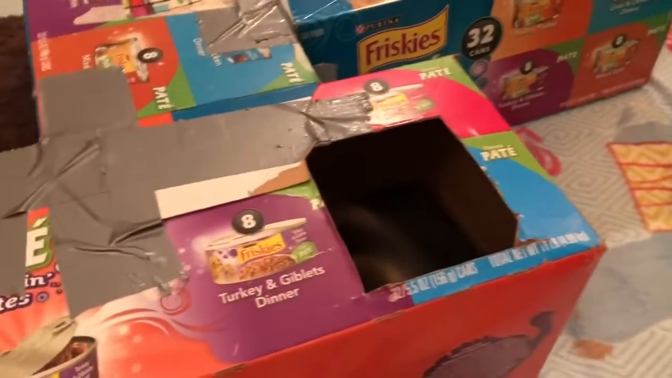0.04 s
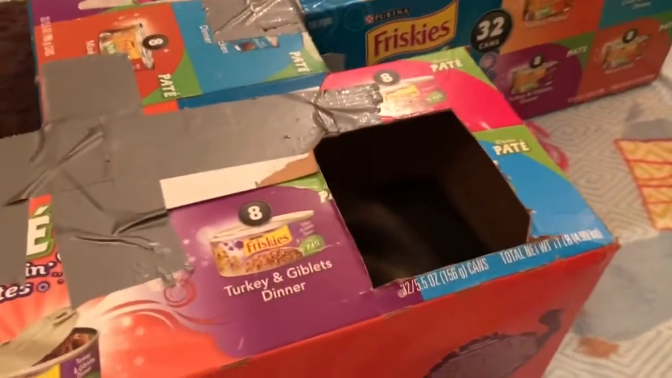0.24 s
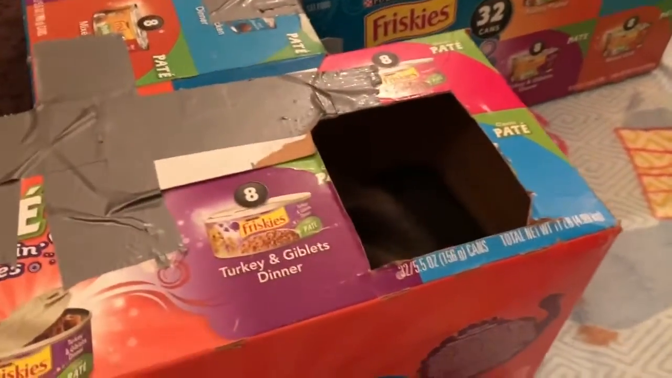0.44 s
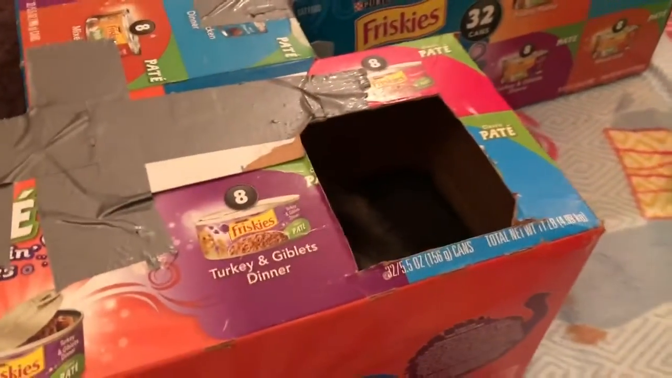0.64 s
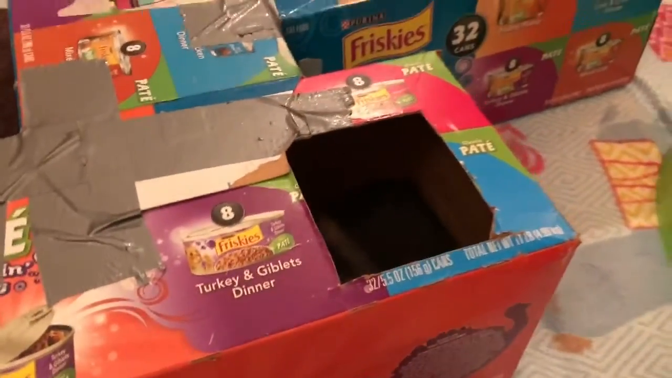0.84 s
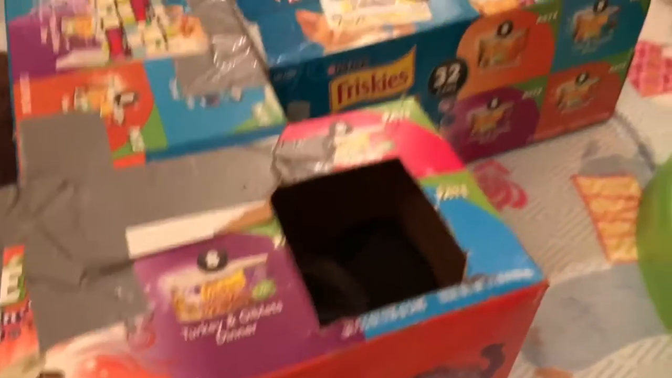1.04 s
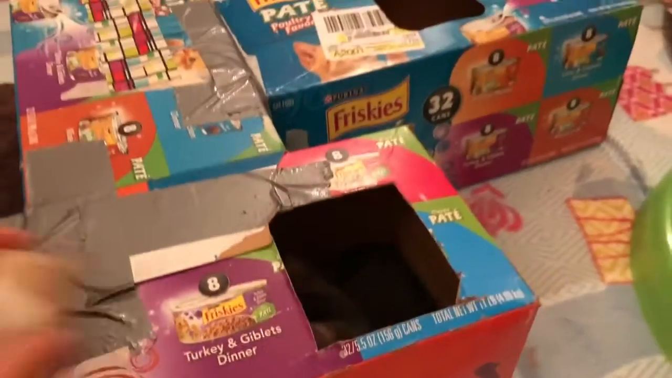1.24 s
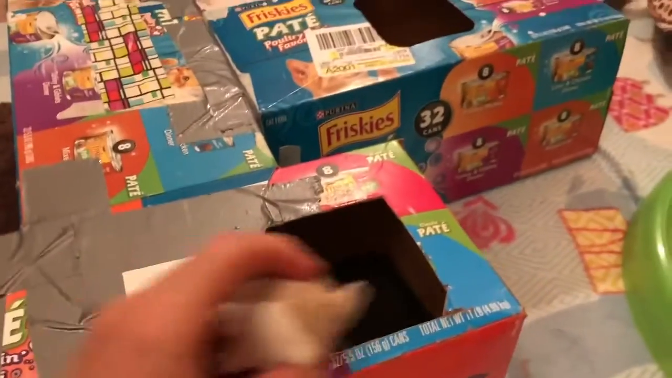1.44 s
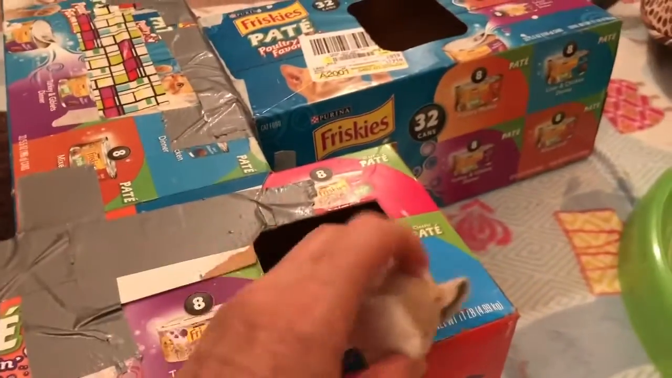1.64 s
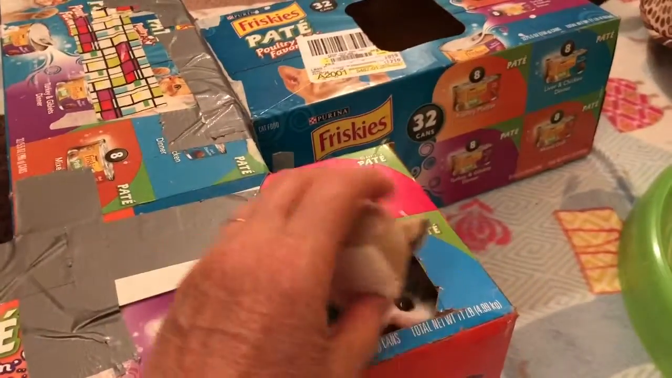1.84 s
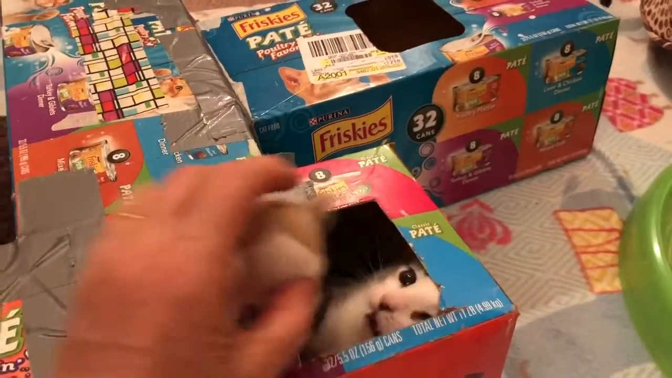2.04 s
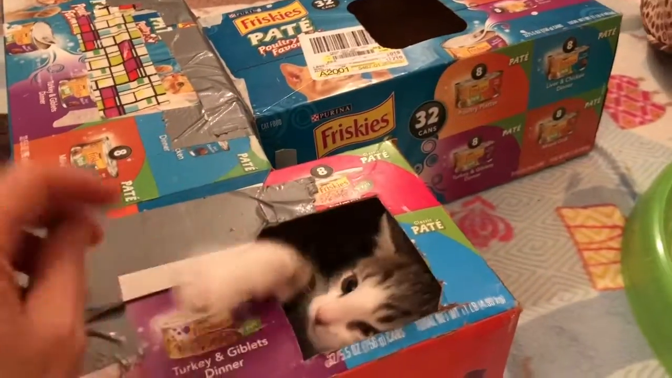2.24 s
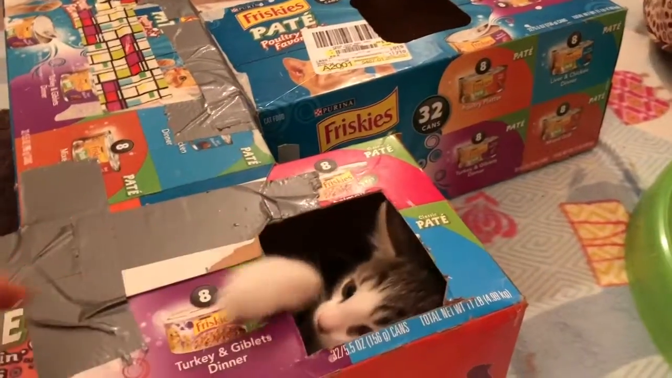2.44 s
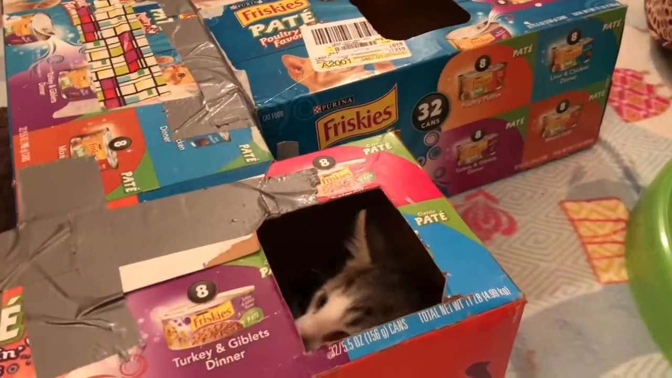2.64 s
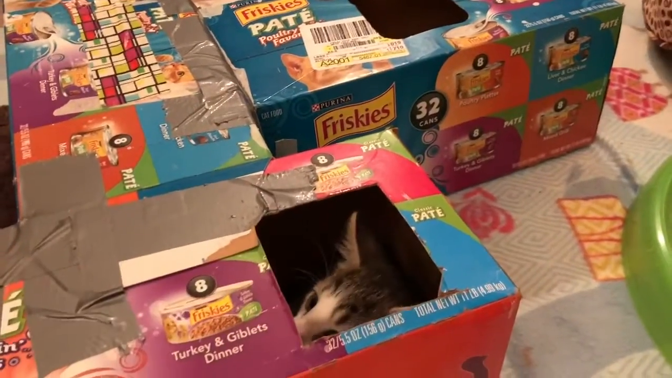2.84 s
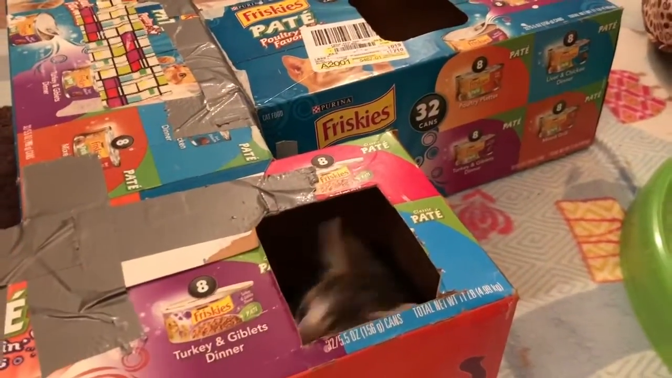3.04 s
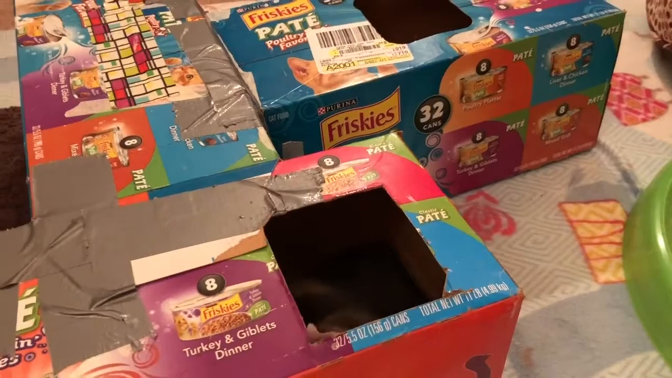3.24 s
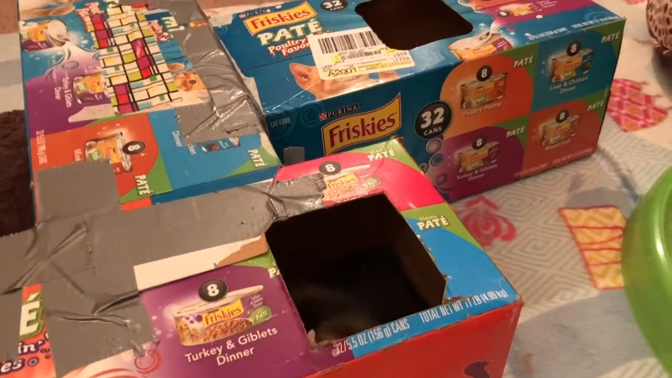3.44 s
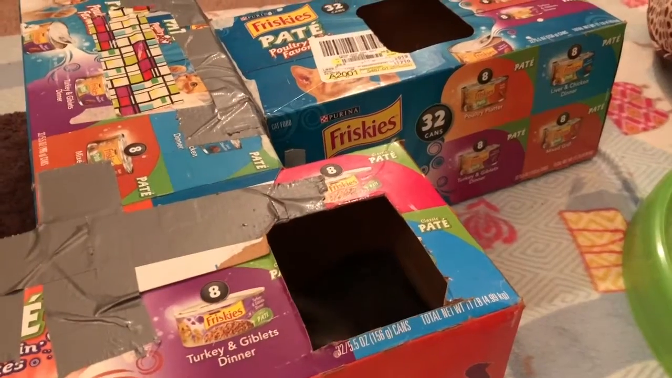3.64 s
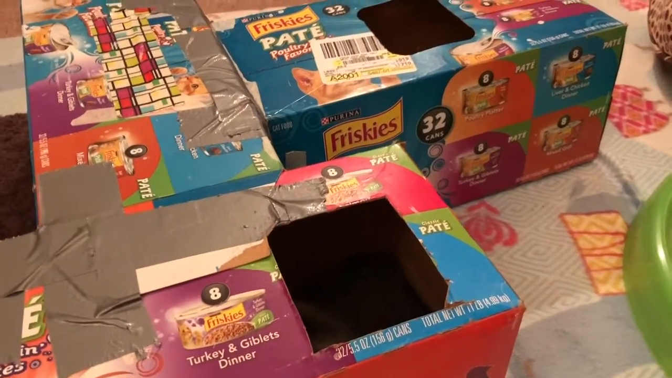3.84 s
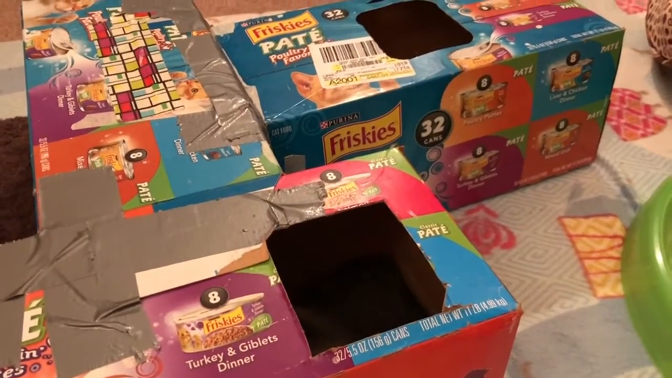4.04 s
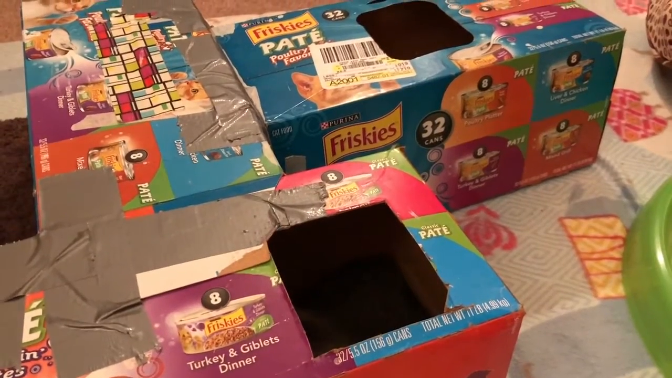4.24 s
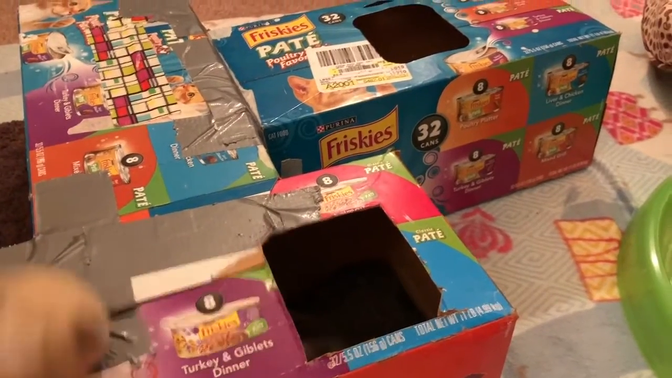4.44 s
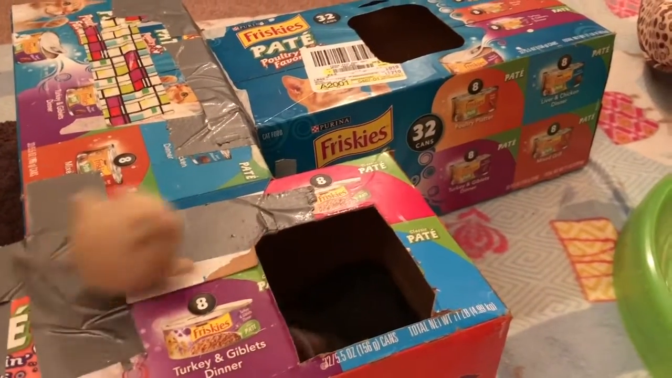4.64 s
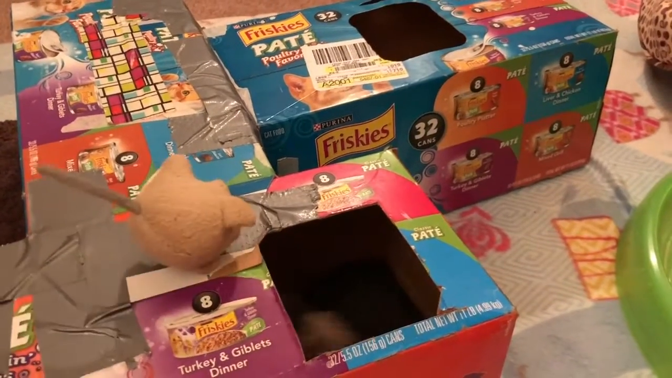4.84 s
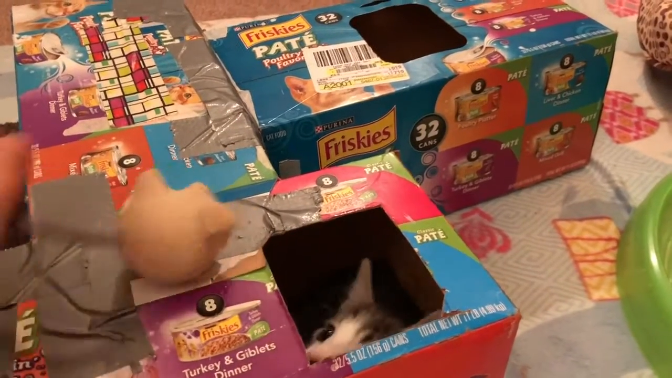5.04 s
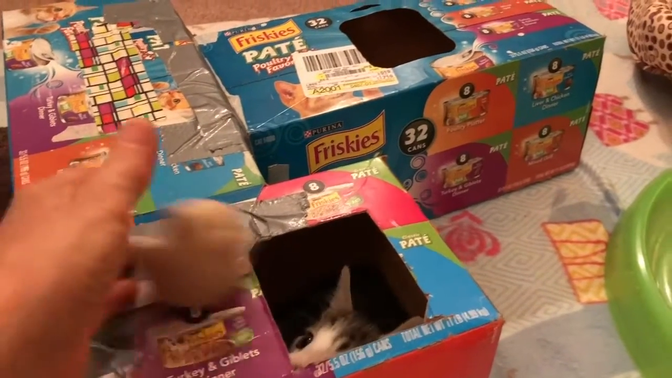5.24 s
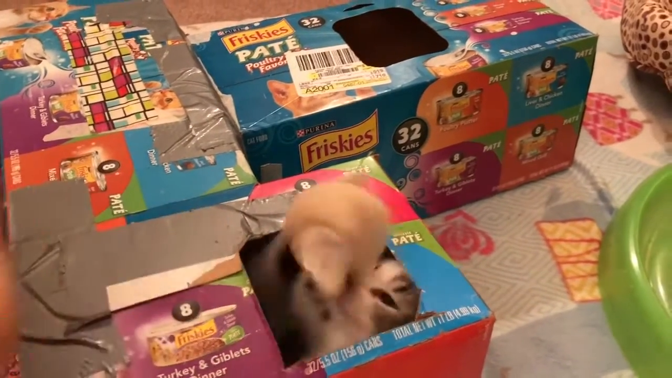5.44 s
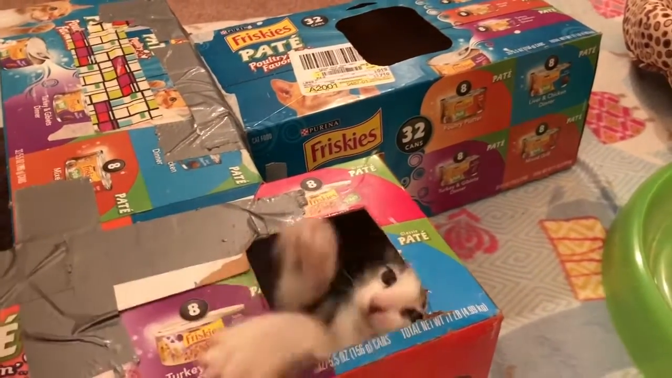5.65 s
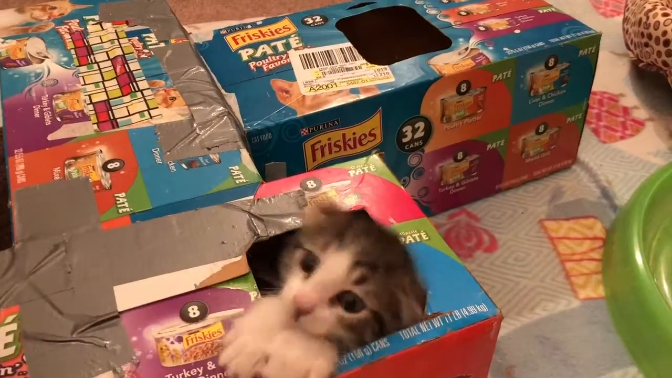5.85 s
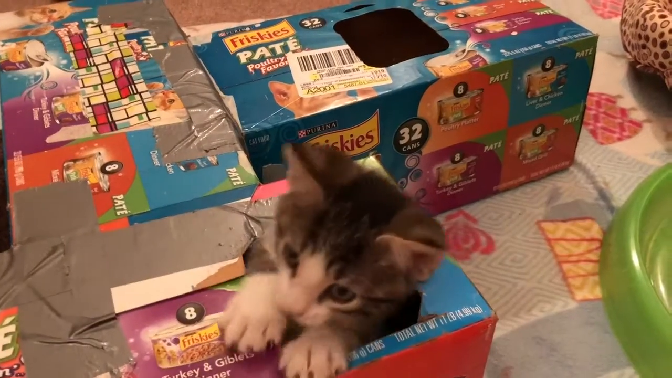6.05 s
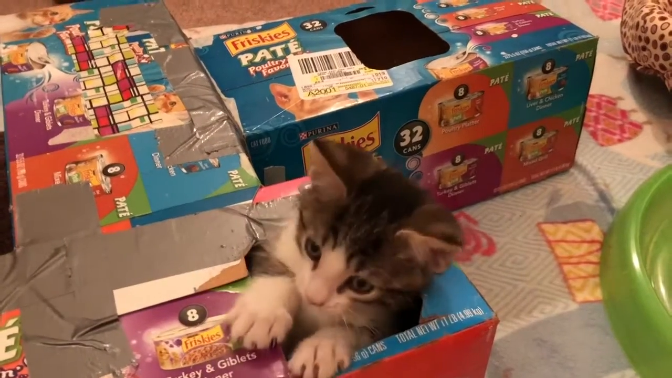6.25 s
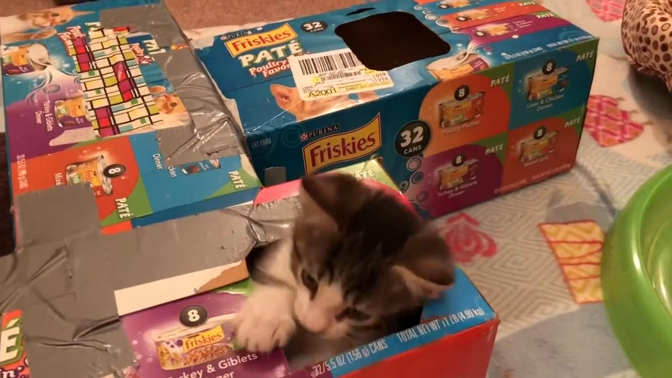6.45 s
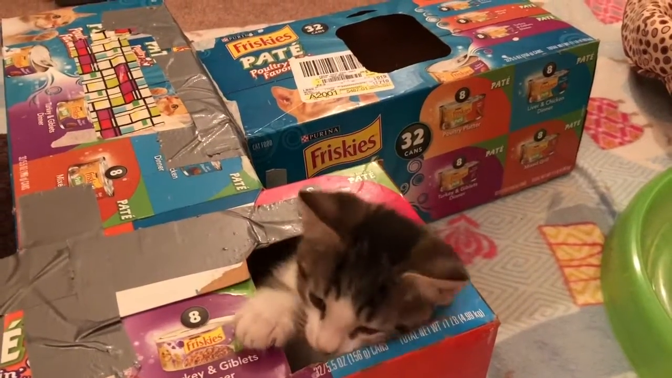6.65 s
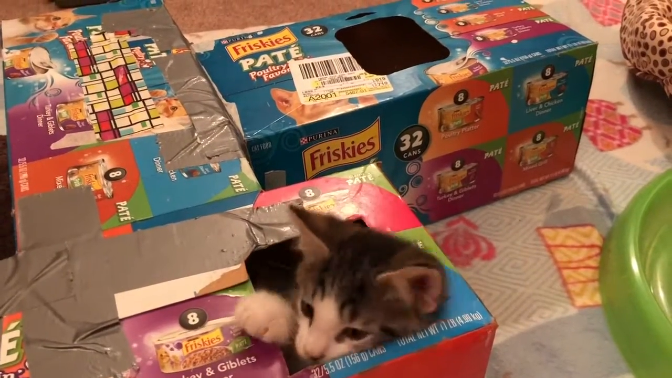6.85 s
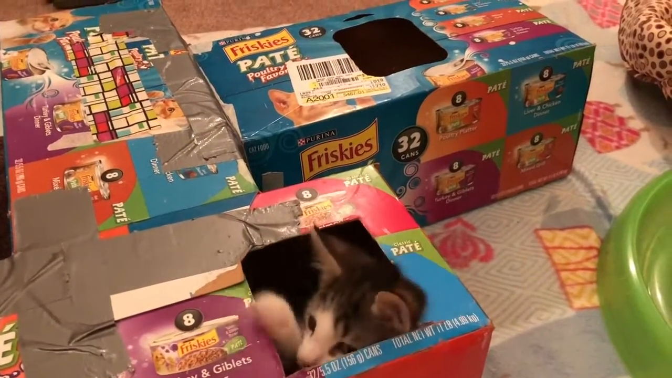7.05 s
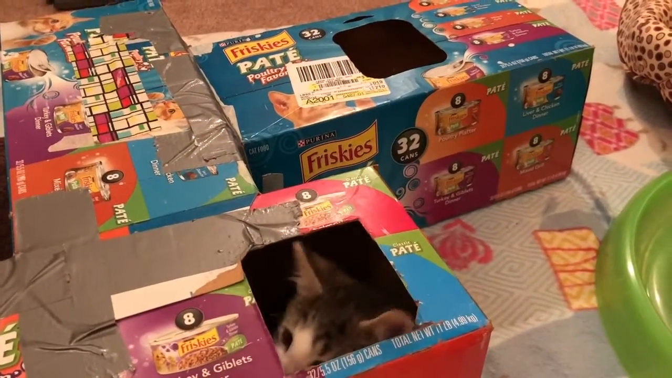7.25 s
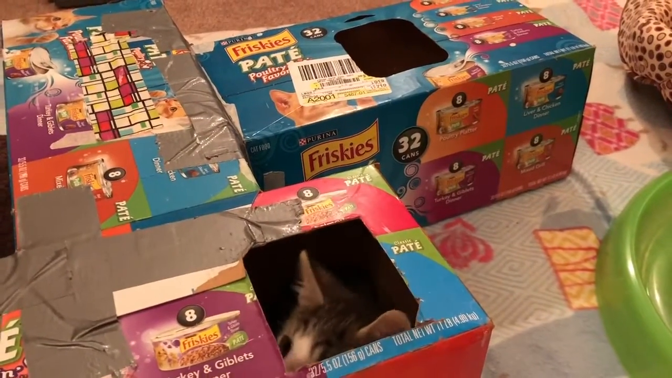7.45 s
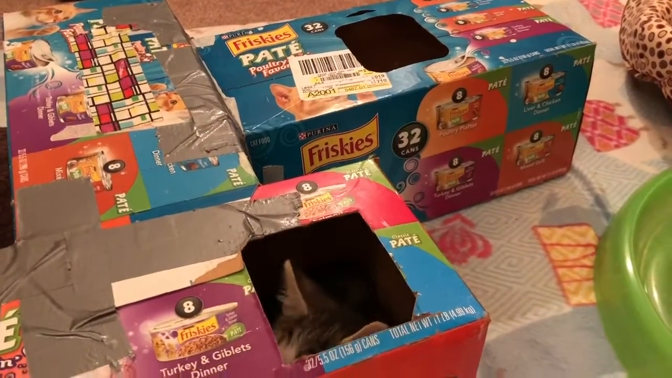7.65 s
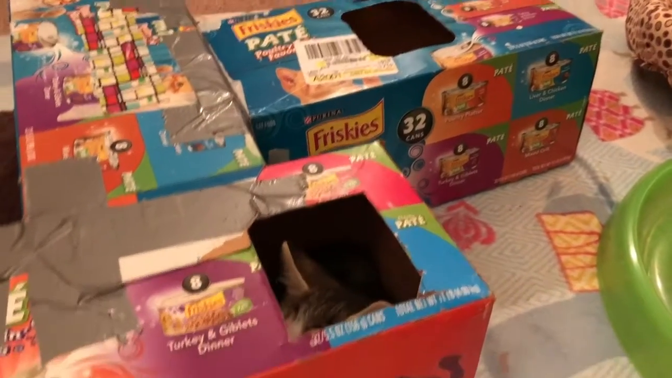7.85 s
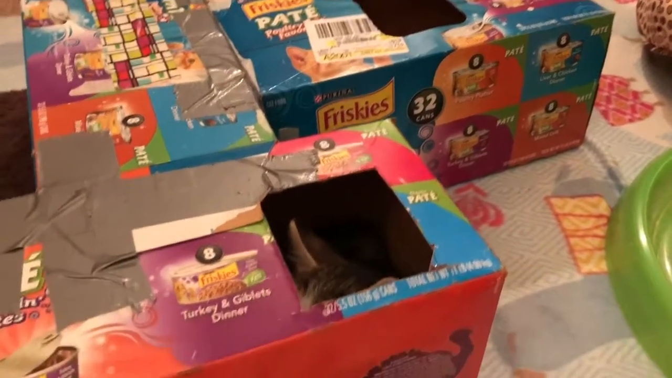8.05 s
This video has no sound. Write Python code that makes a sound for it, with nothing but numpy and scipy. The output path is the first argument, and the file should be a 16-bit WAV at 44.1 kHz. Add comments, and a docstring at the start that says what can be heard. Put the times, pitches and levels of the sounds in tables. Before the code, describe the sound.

A bead rattle in a soft toy clatters brightly while a kitten's paws knock, scuff and rustle inside hollow cardboard boxes in a quiet room.

```python
"""A bead rattle inside a soft toy clatters as the toy is waved, dropped and batted about: noise pushes drive
the modes of its shell, bead by bead. A kitten moves in a maze of taped cardboard boxes in a quiet room:
knocks of paws and toy are dispersed bending pulses and damped panel modes, coloured by box resonances.
Fur, claws and plush rub on the cardboard as stick-slip grains through shifting panel resonances.
A short echo and a low room tone with a faint hum surround them."""
import sys
import numpy as np
from scipy import signal
from scipy.fft import rfft, irfft, next_fast_len
from scipy.io import wavfile
from scipy.ndimage import uniform_filter1d

SR = 44100
rng = np.random.default_rng(int(sys.argv[2]) if len(sys.argv) > 2 else 0)


def output_pcm(signal):
    """Save a mono or channel-first signal as 16-bit PCM at the path in sys.argv[1].

    Samples are clipped to [-1, 1] before scaling.
    """
    pcm = np.clip(np.atleast_2d(signal).T, -1, 1) * 32767
    wavfile.write(sys.argv[1], SR, np.round(pcm).astype(np.int16))


N = 357638
TIME = np.arange(N) / SR

# the rattle shell's modes in a main, an upper and a lower group: (f/Hz, width/Hz, relative level/dB)
SHELL_MAIN_MODES = [(7760, 340, -12), (8364, 570, 5.5), (8550, 230, 5.5), (9510, 300, -7.5),
                    (9600, 300, -3)]
SHELL_UPPER_MODES = [(12700, 1000, -11), (14350, 550, 0), (14850, 600, -8), (15500, 400, -1)]
SHELL_LOWER_MODES = [(2574, 1600, -15.5), (4070, 1400, -5), (5000, 200, -7), (5730, 570, -11),
                     (6770, 1700, 0.5)]


def undb(db):
    """The decibel is logarithmic: level in dB to amplitude gain."""
    return 10 ** (np.asarray(db) / 20)


def unit(x, seconds=None):
    """Level is mean power: scale to rms 1, over the first seconds if given."""
    head = x if seconds is None else x[:int(seconds * SR)]
    return x / np.sqrt(np.mean(head ** 2) + 1e-30)


def add(track, at, sound):
    """Superposition: mix a sound into the track at a time in seconds."""
    i = int(np.clip(at * SR, 0, N - 1))
    track[i:i + len(sound)] += sound[:N - i]


def band(x, lo_hz, hi_hz, order=2):
    """Causal band-pass filtering."""
    edges_hz = [lo_hz, min(hi_hz, .47 * SR)]
    return signal.sosfilt(signal.butter(order, edges_hz, "band", fs=SR, output="sos"), x)


def colour(x, points):
    """Spectral shaping: gain interpolated between (f/Hz, gain/dB) points on a logarithmic frequency axis."""
    hz, db = np.transpose(points)
    size = next_fast_len(len(x))
    f = np.fft.rfftfreq(size, 1 / SR) + 1
    gain = undb(np.interp(np.log(f), np.log(hz), db))
    return irfft(rfft(x, size) * gain, size)[:len(x)]


def resonate(x, hz, width_hz):
    """Driven damped oscillator: one resonance, gain 1 at its centre."""
    hz = min(hz, .45 * SR)
    return signal.lfilter(*signal.iirpeak(hz, hz / width_hz, fs=SR), x)


def grains(per_second, spread_db):
    """Poisson-like process: randomly timed tiny impacts of uneven size and either sign."""
    size = undb(spread_db * np.clip(rng.standard_normal(N), -2, 2)) * rng.choice([-1, 1], N)
    return (rng.random(N) < per_second / SR) * size


def walk(rate):
    """Slow random modulation: a new level every 1 / rate s, joined by ramps; spread near 1."""
    k = max(int(SR / rate), 1)
    held = np.repeat(rng.standard_normal(N // k + 1), k)
    return 1.0 * uniform_filter1d(held, k)[:N]


def room_tone(level_db=-59, hum_hz=120, hum_db=-68):
    """Stationary coloured noise: low household rumble with a faint mains hum, both wavering slightly."""
    # spectrum of the rumble: (f/Hz, relative level/dB)
    rumble_spectrum = [(20, -43), (30, -38.5), (42, -4.5), (70, -4.5), (120, -0.5), (170, -2), (240, -5),
                       (320, -6), (420, -15.5), (700, -19.5), (1500, -27), (3000, -31.5), (7000, -32.5),
                       (15500, -38.5)]
    rumble = unit(colour(rng.standard_normal(N), rumble_spectrum))
    rumble = rumble * undb(level_db - 0.25 * walk(2.4))
    hum = np.sqrt(2) * np.sin(2 * np.pi * hum_hz * TIME)
    return rumble + undb(hum_db - 0.5 * walk(5.3)) * hum


def room(x, t60=0.39, wet_db=-20.5, gap_s=0.0022):
    """Reverberation: an exponentially decaying echo of a furnished room, which swallows the treble."""
    t = np.arange(SR // 2) / SR
    tail = colour(rng.standard_normal(len(t)), [(1500, 0.0022), (9500, -2), (14000, -11)])
    fade = np.exp(-np.log(1000) * t / t60) * (t > gap_s)
    echo = tail * fade / np.sqrt(np.sum(fade ** 2))
    return x + undb(wet_db) * signal.fftconvolve(x, echo)[:N]


def box(x, stretch=1):
    """Cavity and wall resonance: box modes stand out of what shakes them; stretch retunes the compartment."""
    # air and wall resonances: (f/Hz, width/Hz, level over the dense modes between them/dB)
    box_modes = [(45, 16, 6.5), (90.5, 14, 5.5), (121.2, 12, 9), (160.5, 31, 13.5), (286.5, 5.4, 8),
                 (313, 27, 2.5), (484, 76, 5.5), (668, 30.8, 3.5), (746, 32, 4.5), (1170, 150, 2),
                 (2415, 750, 8.5)]
    return x + sum((undb(db) - 1) * resonate(x, hz * stretch, width) for hz, width, db in box_modes)


def slips(catch_db=2.5, snag_db=-11):
    """Stick-slip friction: fibres catch and let go in uneven spurts of dense grains, with odd claw snags."""
    fibres = unit(grains(per_second=2200, spread_db=2)) + .55 * rng.standard_normal(N)
    snags = unit(grains(per_second=45, spread_db=3))
    return (fibres + undb(snag_db) * snags) * undb(catch_db * walk(70))


def shifting(x, count=26, shift_db=5, sharpness=9):
    """Moving excitation point: as the contact slides, one panel resonance after another takes over."""
    centres = np.geomspace(350, 9000, count) * np.exp(.04 * rng.standard_normal(count))
    panels = sum(resonate(x, hz, hz / sharpness) * undb(shift_db * walk(24)) for hz in centres)
    return .55 * x + panels


def stroke(at, length):
    """Speed governs friction level: a stroke swells to its fastest moment and eases off more slowly."""
    edge_db, rise_share, roundness = 7, 0.47, 1.47  # length is the time within edge_db of the peak
    away = np.maximum((at - TIME) / rise_share, (TIME - at) / (1 - rise_share)) / length
    near, gain = away < 10, np.zeros(N)
    gain[near] = undb(-edge_db * away[near] ** roundness)
    return gain


def rubbing(friction, rasp_db=-3.5, hiss_db=5.0):
    """Two radiation paths: fur and plush hiss at the surface and rasp through the walls, stroke by stroke."""
    # filters of the walls and of the surface: (f/Hz, relative gain/dB)
    wall_filter, surface_filter = [(100, -11), (220, 6), (450, -5), (1000, -5), (1400, -8.5), (2200, -20),
                                   (5000, -28.5)], [(600, -27), (1200, -2), (1800, -4.5), (3000, 2.5),
                                                 (5000, 1), (7000, -1.5), (10000, -6), (15500, 2.5)]
    # slides: (fastest moment t/s, length/s, wall level/dB before rasp_db, surface level/dB before hiss_db)
    slides = [(0.34, 0.24, -66, -82), (0.588, 0.11, -49.5, -64.5), (1.183, 0.029, -41.5, -59),
              (1.36, 0.34, -61.5, -72), (1.576, 0.04, -51.5, -58), (1.71, 0.18, -53.5, -65.5),
              (1.966, 0.19, -60.5, -64.5), (2.106, 0.024, -57, -61), (2.239, 0.13, -47.5, -58.5),
              (2.59, 0.34, -56, -67), (2.863, 0.04, -58, -88), (3.09, 0.09, -61, -86),
              (4.513, .06, -67, -70), (4.68, 0.13, -58.5, -63), (4.909, 0.12, -56.5, -74.5),
              (5.267, 0.032, -52, -62), (5.453, 0.13, -51.5, -64.5), (5.652, 0.13, -50.5, -59),
              (5.803, 0.056, -49.5, -58), (5.982, 0.21, -45, -58.5), (6.264, 0.12, -53, -61.5),
              (6.457, 0.1, -58, -61), (6.64, 0.094, -56, -61.5), (7.019, 0.4, -52.5, -62),
              (7.299, 0.021, -67, -67), (7.372, 0.051, -49, -59), (7.404, 0.047, -55, -73),
              (7.612, 0.12, -59, -74)]
    rasp = unit(colour(box(friction), wall_filter)) * undb(rasp_db)
    hiss = unit(colour(friction, surface_filter)) * undb(hiss_db)
    return sum(stroke(at, length) * (undb(wall_db) * rasp + undb(surface_db) * hiss)
               for at, length, wall_db, surface_db in slides)


def scuffs(friction):
    """Friction-driven resonance: a paw drags over one panel, which sings, swelling and easing off."""
    # drags: (middle t/s, length between the 1/e points/s, panel f/Hz, width before broadening/Hz, level/dB)
    drags = [(0.54, 0.026, 2600, 2000, -66), (0.618, 0.0051, 2700, 800, -42), (1.184, 0.029, 576, 300, -45),
             (1.171, 0.012, 1900, 1600, -51), (1.435, 0.0084, 2980, 2500, -57.5),
             (1.558, 0.016, 3220, 2200, -56), (1.643, 0.015, 3950, 3500, -62),
             (1.733, 0.014, 4000, 2500, -56), (1.781, 0.0053, 3000, 2500, -57),
             (1.85, 0.01, 5100, 4000, -65), (1.999, 0.0068, 3460, 1600, -47), (2.865, 0.019, 900, 600, -60),
             (3.086, 0.032, 930, 303, -60), (3.127, 0.012, 1493, 500, -59.5),
             (5.479, 0.025, 524, 296.8, -43.5), (5.592, 0.024, 506, 248, -43), (5.68, .02, 2700, 1800, -58),
             (5.797, 0.0061, 1150, 500, -58), (5.968, .008, 2500, 1800, -54),
             (6.04, 0.025, 2280, 1900, -54), (6.224, 0.0032, 3300, 3500, -46),
             (6.24, 0.04, 2130, 2000, -50.5), (6.434, 0.093, 2320, 900, -62),
             (6.607, 0.047, 2300, 1200, -59.5), (6.69, .03, 3220, 1000, -64),
             (6.788, 0.053, 2600, 900, -64), (6.964, 0.17, 900, 380, -58),
             (7.054, 0.0071, 1000, 600, -43.5), (7.07, 0.12, 13000, 7000, -67),
             (7.11, 0.021, 2600, 3000, -58), (7.393, .01, 3520, 7000, -48)]
    out = np.zeros(N)
    for at, length, hz, width, db in drags:
        broad = 1.2 * width  # each of two resonances in series
        song = unit(resonate(resonate(friction, hz, broad), hz, broad))
        out += song * undb(db) * np.exp(-(2 * (TIME - at) / length) ** 2)
    return out


def bending_pulse(size, lag_s, lag_hz=300):
    """Dispersion of bending waves: highs arrive first, the delay goes as 1 / sqrt(f), lag_s at lag_hz."""
    f = np.fft.rfftfreq(size, 1 / SR)
    return irfft(np.exp(-4j * np.pi * lag_s * np.sqrt(lag_hz * f)), size)


def panel_modes(t, count=70):
    """Modal superposition: every spot rings with its own bending modes, thinning out towards the treble."""
    hz = 45 * (6000 / 45) ** ((np.arange(count) + rng.random(count)) / count)
    waves = np.sin(2 * np.pi * (hz[:, None] * t + rng.random((count, 1))))
    return unit(np.sqrt(hz) @ waves)


def softened(hz, contact_ms):
    """Contact-time law: a soft push cannot shake what swings faster than it lasts; the level change in dB."""
    return -10 * np.log10(1 + (hz * contact_ms / 1000) ** 6)


def dulled(x, contact_ms, corner_swings=2.1):
    """Contact-time low-pass: the longer the push, the lower the pitch above which a blow falls away."""
    hz = np.clip(corner_swings * 1000 / contact_ms, 500, 12000)
    return signal.sosfilt(signal.butter(2, hz, fs=SR, output="sos"), x)


def knocks(lag_s=0.00292, scatter=0.24, build_s=0.00055, damping=0.47, detune=0.037):
    """Impact on a damped plate: a bending pulse, then panel ringing that dies sooner in the treble."""
    # paws and toy on the boxes: (t/s, hollow f/Hz, level/dB, thud level of the weight behind it/dB,
    # contact/ms, ring t60 at 420 Hz/s)
    blows = [(0.6183, 290, -42.5, -53.5, 2.1, 0.094), (1.1795, 287, -46.5, -56.5, 0.59, 0.19),
             (1.2309, 224, -49.5, -74, 0.9, 0.097), (1.726, 265, -54, -56, 1.2, 0.093),
             (1.777, 315, -59, -64, 0.72, 0.055), (1.878, 331, -40.5, -52.5, 3.5, 0.033),
             (1.933, 293, -46.5, -74, 6, 0.15), (1.973, 257, -38, -69, 1.1, 0.075),
             (1.996, 314, -50, -52.5, 0.58, 0.22), (2.165, 269, -47, -76, 7.3, 0.1),
             (2.257, 162, -54.5, -49, 3.8, 0.24), (2.305, 150, -63, -56, 5, 0.18),
             (2.497, 290, -47.5, -41, 1.6, 0.15), (2.549, 300, -53.5, -49.5, 1.9, .1),
             (2.615, 162, -45.5, -40.5, 1.7, 0.066), (3.121, 260, -63, -68, 0.8, 0.061),
             (3.411, 260, -63, -75, .8, .05), (4.481, 260, -64, -66.5, 1.2, .04),
             (4.489, 187, -41.5, -41, 3.8, 0.2), (4.616, 260, -66, -68, 0.87, .06),
             (4.751, 210, -44, -40, 5.4, 0.19), (4.801, 260, -64.5, -60, 0.8, 0.098),
             (4.877, 322, -51, -72, 5, 0.15), (5.286, 152, -53, -49, 2.6, 0.37),
             (5.469, 288, -55, -74, 0.16, 0.072), (5.483, 282, -38.5, -42, 7, 0.078),
             (5.579, 187, -48.5, -67, 4.4, 0.46), (5.601, 168, -34.5, -41.5, 5.6, 0.17),
             (5.688, 194, -61.5, -75, 0.21, 0.22), (5.7975, 190, -43.5, -42.5, 0.71, 0.14),
             (5.888, 265, -57.5, -62, 0.64, 0.049), (5.962, 364, -39.5, -83, 7.6, 0.17),
             (6.025, 270, -48.5, -43.5, 3.1, 0.15), (6.198, 262, -44, -69, 4.4, 0.08),
             (6.481, 280, -53, -73, 0.51, 0.13), (6.645, 328, -59, -59, 0.58, 0.077),
             (6.668, 328, -60.5, -69, 0.54, 0.099), (7.05, 300, -50, -72, 0.75, 0.064),
             (7.129, 153, -49, -47.5, 2.8, 0.15), (7.3314, 195, -46.5, -58, 0.53, 0.054),
             (7.392, 229, -61.5, -62, 0.24, 0.067), (7.624, 168, -54, -77, 3, 0.084),
             (8.095, 360, -49.5, -69, 0.87, 0.068)]
    # thud, hollow, wall and surface crack: (lower edge f/Hz, upper edge f/Hz)
    knock_bands = [(35, 140), (140, 420), (400, 1150), (1300, 5000)]
    wall_db, crack_db = 1, 7.5  # at the hardest blow, relative to the hollow boom
    hollow_width_hz, hollow_db, snap_db = 45, 13, -10
    blow_s = .03  # levels hold over this first stretch
    out, t = np.zeros(N), np.arange(12288) / SR
    wall_hz, crack_hz = np.sqrt(np.prod(knock_bands[2:], axis=1))
    pulse = bending_pulse(len(t), lag_s)
    for at, hz, blow_db, thud_db, contact_ms, t60 in blows:
        levels = (thud_db, blow_db, blow_db + wall_db + softened(wall_hz, contact_ms),
                  blow_db + crack_db + softened(crack_hz, contact_ms))
        ring, sound = panel_modes(t), 0
        stretch = np.exp(detune * rng.standard_normal())
        for (lo, hi), db in zip(knock_bands, levels):
            life = t60 * (420 / np.sqrt(lo * hi)) ** damping
            fade = (1 - np.exp(-t / build_s)) * np.exp(-np.log(1000) * t / life)
            wave = pulse + scatter * ring * fade / np.sqrt(SR * build_s)
            if lo < hz < hi:  # the struck compartment booms at its own pitch
                wave = wave + undb(hollow_db) * resonate(wave, hz, hollow_width_hz)
            if lo > hz:
                wave = dulled(wave, contact_ms)
            wave = band(box(wave, stretch), lo, hi, order=3 if lo > hz else 2)
            sound = sound + undb(db) * unit(wave, blow_s)
        # the paper skin crackles along with the surface crack, whose fade is the last one above
        crackle = band(rng.standard_normal(len(t)) ** 3 * fade, 5000, 15150, order=1)
        add(out, at, sound + undb(levels[-1] + snap_db) * unit(crackle, blow_s))
    return out


def shell(push, modes, scatter_db, detune):
    """Position-dependent mode excitation: the shell rings a little differently wherever a bead hits."""
    chance = rng.standard_normal((len(modes), 2))
    return sum(undb(db + scatter_db * a) * resonate(push, hz * (1 + detune * b), width)
               for (hz, width, db), (a, b) in zip(modes, chance))


def rolling():
    """Exponential onset and relaxation: loose beads start with each move of the toy, keep going and settle."""
    # moves of the toy: (start t/s, length/s, drive of the rolling beads/dB)
    moves = [(0.23, 0.27, -62), (1.095, 0.068, -59), (2.176, 0.083, -51), (2.488, 0.19, -50.5),
             (2.717, 0.22, -74), (4.507, 0.014, -49), (4.658, 0.068, -48), (5.32, 0.23, -50),
             (5.586, 0.13, -55), (5.936, 0.14, -53.5), (6.22, 0.017, -60)]
    rise_s, settle_s = 0.013, 0.079  # time constants
    drive = np.zeros(N)
    for at, length, db in moves:
        before = np.maximum(at - TIME, 0)
        after = np.maximum(TIME - at - length, 0)
        drive += undb(db) * np.exp(-before / rise_s - after / settle_s)
    return drive


def trickle(level_db=-11, upper_db=-13, lower_db=-13, shimmer_db=-12, count=5):
    """Random impact trains: light contacts of a few beads, each with its own colour, over a rolling shimmer."""
    ring = 0
    for _ in range(count):
        ticks = grains(per_second=16, spread_db=4)
        for modes, db in (SHELL_MAIN_MODES, 0), (SHELL_UPPER_MODES, upper_db), (SHELL_LOWER_MODES, lower_db):
            ring = ring + undb(db) * unit(shell(ticks, modes, scatter_db=6, detune=.014))
    dense = grains(per_second=900, spread_db=3)
    shimmer = unit(shell(dense, SHELL_MAIN_MODES, scatter_db=1, detune=.003))
    return (ring / np.sqrt(count) * undb(level_db) + undb(shimmer_db) * shimmer) * rolling()


def rattle(skid_s=0.002, skid=0.054, bounce=0.7, bounce_s=.002, after=0.0074, after_s=0.029, upper_db=1.0):
    """Impact excitation of heavily damped modes: each bead hits, skids and bounces once on the shell."""
    # hardest bead strikes: (t/s, main ring level/dB, upper modes relative to main before upper_db/dB)
    strikes = [(0.2165, -53, -13), (0.2642, -54, -5), (0.29, -55.5, -20), (0.325, -58, -12),
               (0.356, -66, 7), (0.374, -57.5, -15), (0.392, -64, -20), (0.45, -50, -13), (0.467, -51, -24),
               (0.7918, -57.5, -12), (1.066, -52, -4), (1.107, -60, -15), (1.138, -54, -17),
               (1.321, -59, 9), (1.329, -55.5, -12), (1.966, -53.5, -20), (2.153, -59.5, 12.5),
               (2.207, -50, 10), (2.2164, -49, -15.5), (2.2216, -43.5, -9), (2.233, -53, 11),
               (2.255, -52, 5.5), (2.274, -45, -16), (2.3053, -28, -5), (2.309, -25.5, -16),
               (2.473, -25, -22), (2.5074, -24.5, -17), (2.513, -45, 4), (2.518, -38, 2),
               (2.5475, -41, -14), (2.556, -39.5, 3), (2.5765, -42, -17), (2.61, -45, -10),
               (2.6236, -22, -12.5), (2.6276, -21.5, -9.5), (2.6375, -42, -22), (2.642, -34.5, -19),
               (2.654, -44, -4), (2.7138, -47, -22), (2.756, -43, 1), (2.7695, -47, -18),
               (2.806, -40.5, -22), (2.8163, -35, -21), (2.8233, -53, -18), (2.8445, -48, -8),
               (2.86, -49, -9), (2.8703, -47, -17), (2.8785, -52, -20), (2.892, -55, -20),
               (2.9025, -53, -21), (2.907, -57, -20), (2.913, -52.5, -13), (2.927, -58, -20),
               (4.4955, -41.5, -8), (4.5, -40.5, -6), (4.5066, -42.5, -8.5), (4.513, -51, -2),
               (4.528, -51.5, -17), (4.5482, -56, -15), (4.569, -56, 2), (4.5905, -33.5, -8),
               (4.6654, -35, -2), (4.6806, -32.5, -18), (4.694, -42, -9), (4.712, -44, -13),
               (4.7178, -51, -12), (4.729, -47, -4), (4.753, -44, -16), (4.76, -51, 3), (4.764, -53, -12),
               (4.7796, -43.5, -25), (4.805, -59, -1), (4.814, -43, -25), (4.833, -57, -23.5),
               (4.841, -57, -19), (5.259, -40.5, -21), (5.2795, -48.5, 4), (5.331, -41.5, 7),
               (5.3388, -37.5, 6), (5.353, -39, -5), (5.3606, -42, -14), (5.387, -44, 1), (5.454, -43, -11),
               (5.4635, -47, 11), (5.4693, -44, 6), (5.4844, -36, -24), (5.487, -28.5, -23),
               (5.516, -49, 0), (5.521, -48, -15), (5.5301, -37, -5), (5.532, -42, -16), (5.577, -52, -19),
               (5.5816, -30.5, -20), (5.587, -37, -15), (5.633, -49, -15), (5.653, -52, -12),
               (5.687, -50, 4), (5.7087, -50.5, -16), (5.7235, -56, 7), (5.733, -51.5, -18),
               (5.7772, -29, -13), (5.7803, -28, -8), (5.7843, -32, -3), (5.7867, -30.5, -12),
               (5.8123, -45, -13), (5.841, -42, -10), (5.884, -39.5, -13), (5.927, -37.5, -9),
               (5.931, -47, 0), (5.9361, -42, 11), (5.942, -46, -3), (5.9785, -49, -8), (5.99, -52, -12),
               (6.057, -48, -13), (6.067, -52, -12), (6.128, -57, -14), (6.2065, -49, -12),
               (6.229, -53, -16), (6.2416, -52, -16), (7.7524, -52.5, -8.5)]
    # the lower modes sit lower_modes_db from the main ring up to middling_db, and sink as strikes get harder
    middling_db, lower_modes_db, sink_db_per_db = -47.5, -3, 0.83
    ring_s = .004  # levels hold over this first stretch
    out, t = np.zeros(N), np.arange(1400) / SR
    for at, db, upper in strikes:
        roughness = skid * np.exp(-t / skid_s) + after * np.exp(-t / after_s)
        push = rng.standard_normal(len(t)) * roughness
        push[0] += 1
        push[int(rng.random() * bounce_s * SR)] += bounce
        lower_db = lower_modes_db - sink_db_per_db * max(db - middling_db, 0)
        groups = (SHELL_MAIN_MODES, 0), (SHELL_UPPER_MODES, upper + upper_db), (SHELL_LOWER_MODES, lower_db)
        ring = sum(undb(group_db) * unit(shell(push, modes, scatter_db=6.5, detune=0.0094), ring_s)
                   for modes, group_db in groups)
        add(out, at, undb(db) * ring)
    return out


def scene():
    """Linear superposition: toy and boxes with their echo, plus the room tone, at one microphone."""
    friction = shifting(slips())
    sources = rattle() + trickle() + knocks() + rubbing(friction) + scuffs(friction)
    return (room(sources) + room_tone())[None]


def record(dry):
    """Band limiting: the phone cuts the deepest bass and the top."""
    dry = signal.sosfilt(signal.butter(4, 32, "high", fs=SR, output="sos"), dry)
    return signal.sosfilt(signal.ellip(8, .2, 70, 15900, fs=SR, output="sos"), dry)


dry = scene()
out = record(dry)
output_pcm(out)
```